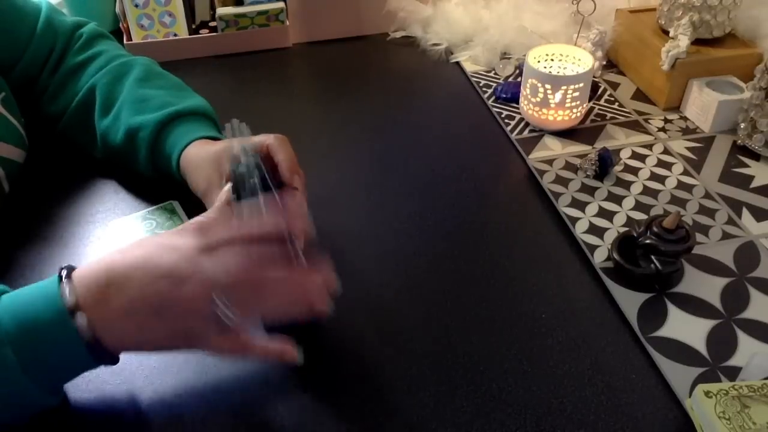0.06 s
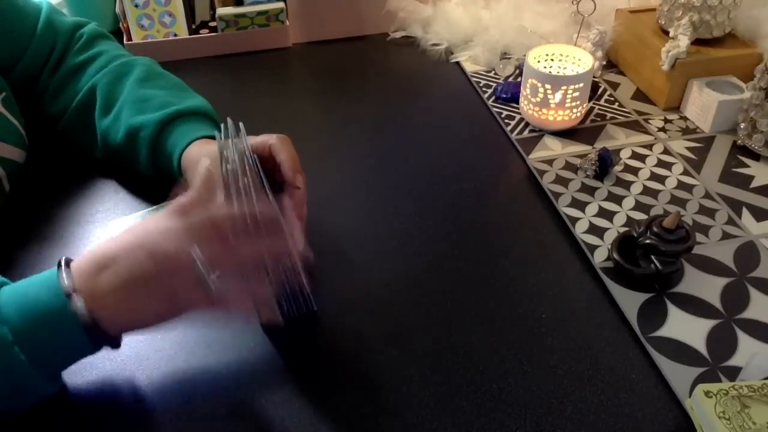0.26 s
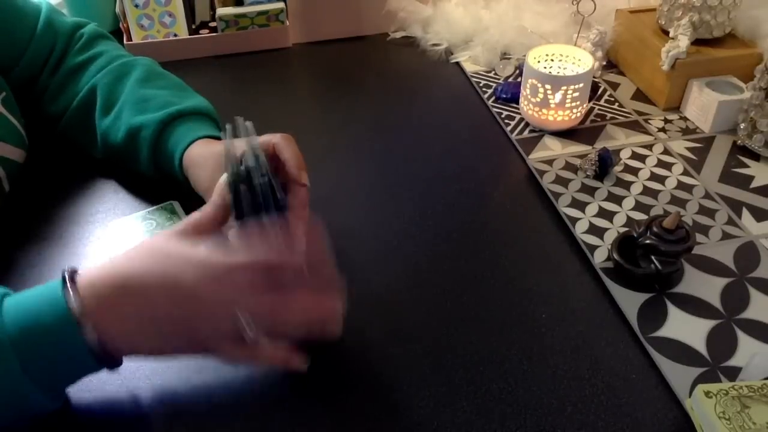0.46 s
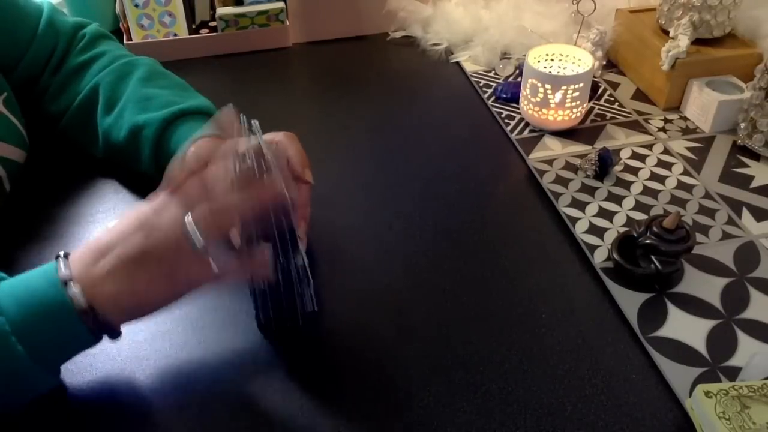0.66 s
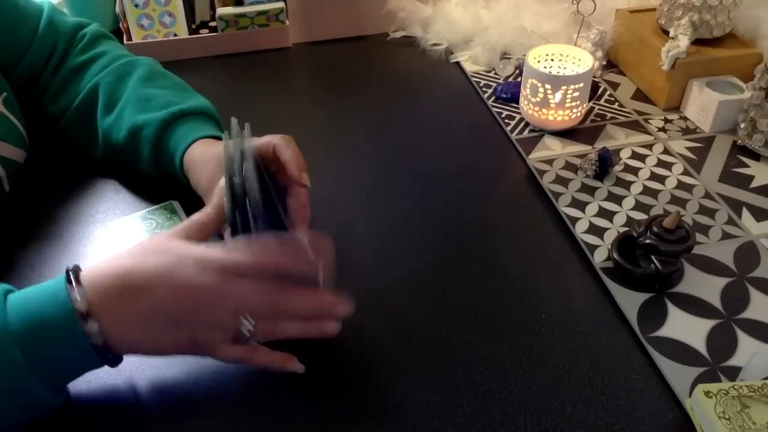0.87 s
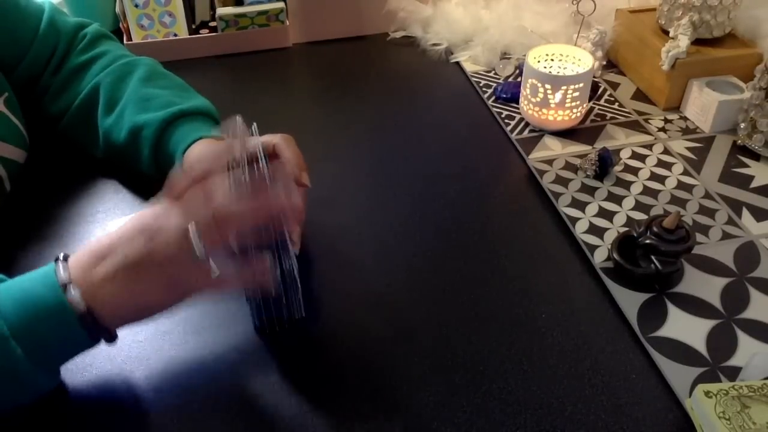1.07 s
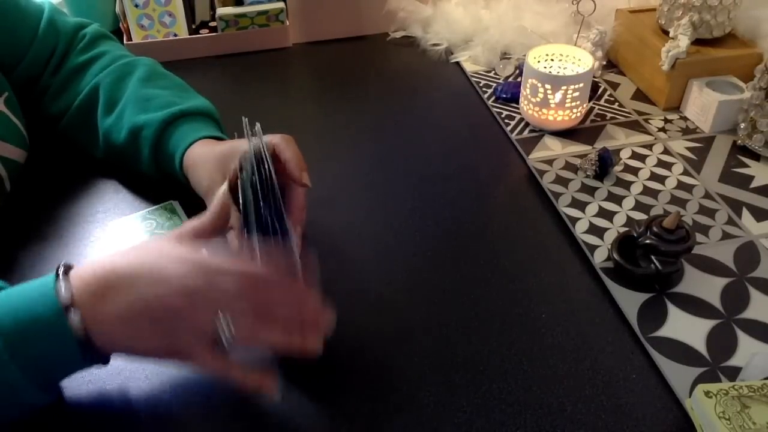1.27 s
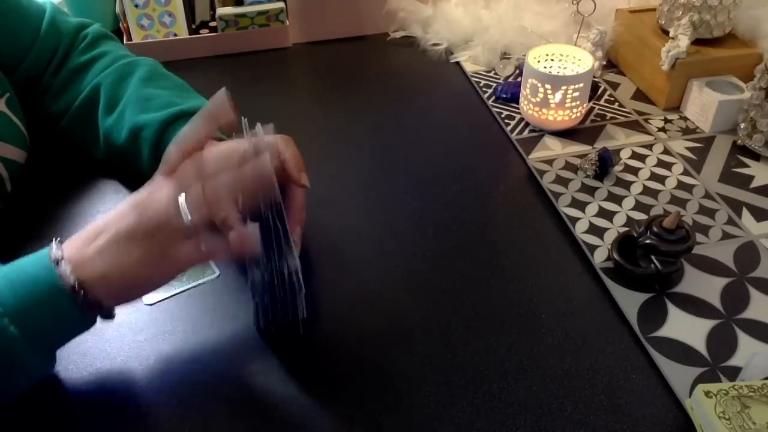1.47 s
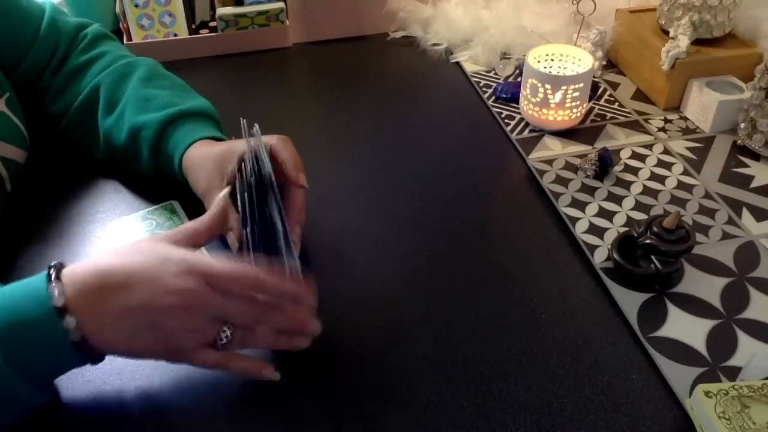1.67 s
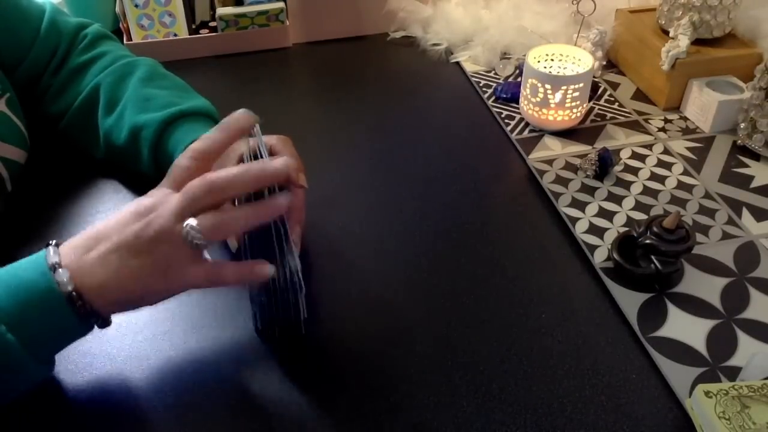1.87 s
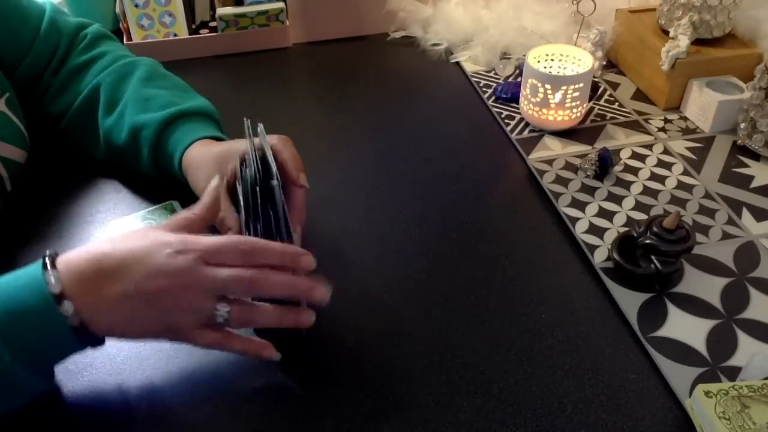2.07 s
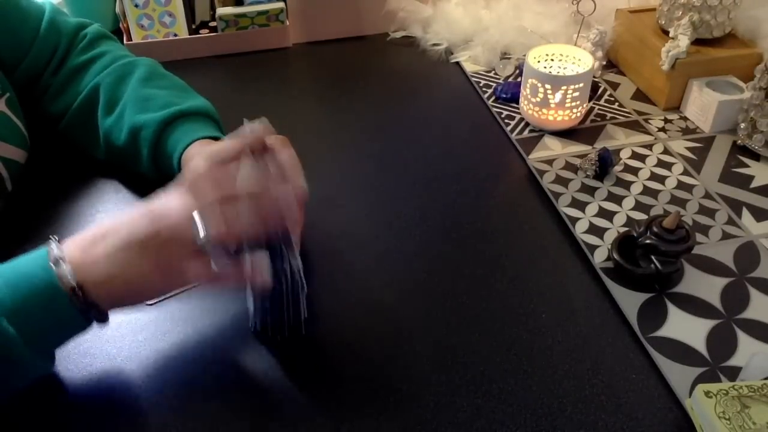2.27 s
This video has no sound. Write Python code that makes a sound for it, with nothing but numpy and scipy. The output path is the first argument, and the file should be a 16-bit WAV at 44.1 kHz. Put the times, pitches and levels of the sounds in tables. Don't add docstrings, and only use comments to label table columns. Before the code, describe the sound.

A deck of playing cards is shuffled overhand over a table in a quiet room; faint rasps swell into crisp slaps and ticks, with dull low thumps from the tabletop, heard close in mono.

```python
import sys
import numpy as np
from scipy import signal
from scipy.fft import rfft, irfft
from scipy.io import wavfile
from scipy.ndimage import uniform_filter1d

SR = 44100
rng = np.random.default_rng(int(sys.argv[2]) if len(sys.argv) > 2 else 0)


def to_linear_factor(level_db):
    exponent = np.asarray(level_db, float) / 20
    return 10 ** exponent


def inscribe(sig):
    pcm = np.round(np.clip(np.atleast_2d(sig).T, -1, 1) * 32767)
    wavfile.write(sys.argv[1], SR, pcm.astype(np.int16))


N = 101429


def evened(x):
    return x / np.sqrt(np.mean(x ** 2) + 1e-20)


def unit(x):
    return x / np.linalg.norm(x)


def read(points, hz):
    f, value = np.transpose(points)
    return np.interp(np.log(hz + 1), np.log(f + 1), value)


def add(mix, start_s, sound):
    part = mix[max(round(start_s * SR), 0):][:len(sound)]
    part += sound[:len(part)]


def ring(modes, length_s, spread_db):
    t = np.arange(round(length_s * SR)) / SR
    total = np.zeros(len(t))
    for hz, db, t60 in modes:
        strike_db = db + spread_db * rng.standard_normal()
        total += to_linear_factor(strike_db - 60 * t / t60) * np.sin(2 * np.pi * hz * t)
    return total


def cards():
    # (time [s], peak [dB], body [dB], edge [dB], crack t60 [s])
    slaps = [(0.084, -42, -14, -26, 0.035), (0.092, -30.5, -18, -23.5, 0.028),
             (0.1437, -18.5, -18.5, -32, 0.013), (0.1506, -17, -22.5, -29, 0.031),
             (0.161, -36, -18.5, -23, 0.025), (0.17, -40, -25, -23, 0.032),
             (0.2223, -35.5, -16.5, -46, 0.016), (0.375, -18.5, -12.5, -38, 0.034),
             (0.457, -47, -20, -10, .03), (0.5156, -10, -23.5, -8, 0.041), (0.527, -25.5, -22, -12, 0.035),
             (0.67, -58.5, -12, -12, .03), (0.745, -36.5, -12, -38, 0.06), (0.784, -31, -23, -25, 0.049),
             (0.829, -40.5, -10.5, -15, .03), (0.867, -41, -15, -21, .04),
             (0.883, -15.5, -15, -13.5, 0.035), (0.9, -22, -20.5, -30, 0.029),
             (0.911, -33.5, -15, -33.5, .03), (1.1385, -33.5, -4, -25.5, .04),
             (1.182, -48.5, -21, -11, 0.046), (1.219, -37.5, -14, -14.5, 0.063),
             (1.256, -44, -12, -40, .04), (1.3118, -10.5, -21.5, -10.5, 0.057),
             (1.533, -45.5, -13, -16, 0.017), (1.586, -40, -4, -25, .05), (1.609, -17, -21, -26.5, 0.026),
             (1.62, -30, -17, -26, 0.037), (1.658, -49, -3, -20, 0.046), (1.671, -34.5, -10, -28, 0.039),
             (1.696, -13.5, -18.5, -10.5, 0.036), (1.913, -42, -13, -16, 0.03),
             (1.921, -24, -13, -36.5, 0.074), (1.966, -13, -17, -8.5, 0.028), (1.974, -25, -10, -6, 0.028),
             (1.988, -23, -13.5, -15.5, 0.048), (2.243, -61.5, -6.5, -7, .03),
             (2.255, -48, -7.5, -2, 0.026), (2.287, -48.5, -14, -7, .03)]
    # (time [s], peak [dB], frequency [Hz], t60 [s])
    pops = [(0.1445, -31, 2320, .01), (0.152, -23, 2670, 0.016), (0.1695, -36.5, 2600, .02),
            (0.17, -36, 4620, .02), (0.377, -29, 1970, .03), (0.378, -34.5, 2800, 0.013),
            (0.5165, -21.5, 2760, 0.017), (0.5172, -26, 1940, .035), (0.518, -24, 3540, .025),
            (0.52, -32.5, 7140, 0.073), (0.529, -30.5, 1980, 0.043), (0.7455, -45, 1750, .03),
            (0.786, -37.5, 2690, 0.018), (0.868, -32, 2530, 0.024), (0.8834, -14.5, 1300, 0.0094),
            (0.8838, -14.5, 2500, 0.014), (0.9015, -27, 2420, 0.019), (1.22, -46, 4650, 0.033),
            (1.26, -35, 1100, 0.031), (1.268, -34, 2730, 0.034), (1.273, -37, 875, .03),
            (1.3132, -24, 2780, 0.017), (1.3136, -35, 3780, 0.025), (1.314, -19, 4650, 0.018),
            (1.6102, -22.5, 3695, 0.024), (1.6106, -25.5, 2020, 0.026), (1.659, -36.5, 1180, .05),
            (1.6975, -25.5, 2710, 0.015), (1.925, -36, 2780, 0.028), (1.9672, -21, 2775, 0.019),
            (1.9676, -23.5, 3600, 0.016), (1.968, -26.5, 4500, 0.016), (1.978, -29.5, 2930, .014),
            (1.991, -32.5, 2900, 0.011)]
    # (start [s], length [s], level [dB], body [dB], edge [dB])
    draws = [
        (0.06, 0.08, -47, -8, -20),
        (0.429, 0.092, -42, 3, -17.5),
        (0.795, 0.093, -45, -11, -17.5),
        (1.156, 0.074, -60.5, -8.5, -10.5),
        (1.535, 0.048, -57.5, -13, -7.5),
        (1.633, 0.067, -47.5, -9, -24.5),
        (2.273, 0.057, -56, -5.5, -4.5),
    ]
    # (start [s], length [s], level [dB], body [dB], edge [dB])
    scuffs = [(0, 0.041, -58.5, -12, -17.5), (0.088, 0.011, -57, -20, -9), (0.153, 0.024, -43, -5, -18),
              (0.384, 0.19, -62, -34, -17.5), (0.455, 0.053, -45.5, -12, -33.5),
              (0.74, 0.043, -51, -2, -15), (0.879, 0.014, -34, -24, -8.5),
              (0.883, 0.019, -33, -16.5, -27.5), (1.13, 0.082, -63, -6, -11.5),
              (1.248, 0.037, -42, -13.5, -39.5), (1.262, 0.053, -40.5, -2.5, -23.5),
              (1.534, 0.056, -65, -5, -5.5), (1.584, 0.025, -41, -1, -26),
              (1.661, 0.053, -43.5, -10.5, -36), (1.92, 0.044, -47.5, -5, -19.5),
              (2.018, 0.038, -52, -2, -38.5), (2.247, 0.041, -64, -7, -13)]
    flight_s = .0006
    mix = np.zeros(N)
    for start_s, *row in slaps:
        add(mix, start_s + flight_s, slap(*row))
    for start_s, *row in pops:
        add(mix, start_s, pop(*row))
    for start_s, *row in draws:
        add(mix, start_s, slide(.95, *row))
    for start_s, *row in scuffs:
        add(mix, start_s, slide(.092, *row))
    return mix


def slap(peak_db, body_db, edge_db, crack_t60):
    # (frequency [Hz], level [dB], t60 [s])
    deck_modes = [(736, -5, 0.065), (1188.6, 6, 0.077), (1736, -13.5, 0.081), (2077, -4.5, 0.08)]
    tick_db, tick_t60, crack_db, first_db = 3, .007, 5, -6.5
    knock_db = -4.5 + .28 * (body_db + 15)
    t = np.arange(SR // 3) / SR
    tick_noise, crack_noise = rng.standard_normal((2, len(t)))
    tick = np.diff(tick_noise * to_linear_factor(-60 * t / tick_t60), prepend=0)
    crack = crack_noise * to_linear_factor(-60 * t / crack_t60)
    blow = to_linear_factor(tick_db) * unit(tick) + to_linear_factor(crack_db) * unit(crack) + room()
    blow[0] -= to_linear_factor(first_db)
    deck = unit(ring(deck_modes, len(t) / SR, 1.5))
    struck = through_body(blow, ring_db=-10)[:len(t)] - to_linear_factor(knock_db) * deck
    sound = contact(struck, body_db, edge_db, top_db=-7)
    return to_linear_factor(peak_db) * sound / abs(sound).max()


def pop(peak_db, hz, t60):
    length_s, rise_s, split = .1, .00056, .021
    path = .38 * room()
    path[0] = 1
    tones = [(hz * (1 + split * k), peak_db - 4 - 5 * abs(k), t60) for k in (-1, 0, 1)]
    onset = np.minimum(np.arange(round(length_s * SR)) / SR / rise_s, 1)
    return signal.fftconvolve(ring(tones, length_s, 2.5) * onset, path)


def slide(peak_at, length_s, level_db, body_db, edge_db):
    grit_db, clump_db = 2, 3.5
    n = min(round(length_s * SR) + 2, 6000)
    hiss, rough = rng.standard_normal((2, n))
    grit = grit_db * evened(uniform_filter1d(rough, 24))
    clumps = clump_db * evened(uniform_filter1d(rough[::-1], 260))
    u = np.linspace(0, 1, n)
    stroke = np.minimum(u / peak_at, (1 - u) / (1 - peak_at)) ** 0.73
    rasp = contact(hiss * to_linear_factor(grit + clumps) * stroke, body_db, edge_db, top_db=10)
    path = room()
    path[0] = 1
    sound = through_body(signal.fftconvolve(rasp, path), ring_db=-14.5)
    return to_linear_factor(level_db) * sound / np.sqrt(np.sum(sound ** 2) / n)


def contact(x, body_db, edge_db, top_db):
    # (frequency [Hz], gain [dB])
    mic = [(300, 1.5), (600, 4.5), (1200, -2), (2800, 1), (6000, -5.5), (7300, -8.5), (10000, -10.5),
           (16000, -31)]
    low = body_db + 15
    high = edge_db + 13
    # (frequency [Hz], gain [dB])
    shape = [(375, low - 11.5), (1296, low), (1940, 0), (3030, .28 * high), (8300, high), (13000, high + top_db)]
    hz = abs(np.fft.fftfreq(1024, 1 / SR))
    return signal.fftconvolve(x, causal(read(shape, hz) + read(mic, hz)))


def causal(db):
    log_gain = db * np.log(10) / 20
    spectrum = np.exp(np.conj(signal.hilbert(log_gain)))
    return np.fft.ifft(spectrum).real[:len(db) // 2]


def through_body(x, ring_db):
    # (frequency [Hz], level [dB], t60 [s])
    body_modes = [(558, -4, 0.03), (799, -12.5, 0.12), (950, -4, 0.063), (1222, -5, 0.057),
                  (1750, 0, 0.023), (1910, -9, 0.059), (2280, 2, 0.016), (2910, 2.5, 0.022),
                  (3700, -17, 0.01), (3846, -1, 0.021), (4850, -0.5, 0.016), (7480, -15.5, 0.05),
                  (8790, 5.5, 0.0082), (10510, -11.5, .015)]
    path = to_linear_factor(ring_db) * unit(ring(body_modes, .15, 2.5))
    path[0] = 1
    return signal.fftconvolve(x, path)


def room():
    # (frequency [Hz], t60 [s])
    decay = [(500, 0.17), (1500, 0.19), (3000, 0.15), (5000, 0.2), (6300, 0.097), (7300, 0.25),
             (8500, 0.16), (15000, 0.18)]
    level_db, delay_s, n = -5.5, .0041, SR // 3
    hz, t, z = signal.stft(rng.standard_normal(n), SR, nperseg=128)
    dying = z * to_linear_factor(-60 * t / read(decay, hz)[:, None])
    tail = signal.istft(dying, SR, nperseg=128)[1][:n]
    fade_in = np.clip(np.arange(len(tail)) / SR / delay_s - .5, 0, 1)
    return to_linear_factor(level_db) * unit(tail * fade_in)


def table_top():
    # (time [s], push [dB], ring [dB])
    knocks = [(0.018, -37, -42.5), (0.077, -41.5, -41), (0.15, -29, -40), (0.195, -56, -37.5),
              (0.378, -25, -32.5), (0.41, -63, -34.5), (0.515, -30.5, -37.5), (0.746, -35, -43.5),
              (0.787, -68.5, -55.5), (0.838, -44, -41.5), (0.882, -30, -41), (0.914, -36, -42.5),
              (1.137, -34.5, -51.5), (1.213, -46.5, -58), (1.256, -56, -57.5), (1.312, -48, -41),
              (1.345, -43, -51.5), (1.532, -38.5, -46.5), (1.552, -36, -50.5), (1.605, -31, -42.5),
              (1.696, -66, -47), (1.776, -65, -62), (1.922, -33, -41), (1.965, -30, -44.5),
              (2.009, -58.5, -43.5), (2.256, -35, -51)]
    # (frequency [Hz], level [dB], t60 [s])
    push_modes = [(47, -9.5, .2), (63.5, -3.5, 0.26), (92.6, -8, 0.19), (116.3, 5, 0.081),
                  (136.4, -8.5, 0.022)]
    # (frequency [Hz], level [dB], t60 [s])
    top_modes = [(175, -6, .35), (192.95, 0.5, 0.3), (217, -14, 0.083), (239.9, -5, 0.26),
                 (267, -13.5, 0.43), (293, -3, 0.088), (321.3, -12, 0.41)]
    length_s, swell_s, soft_hz = .8, .005, 380
    out = np.zeros(N)
    swell = 1 - np.exp(-np.arange(round(length_s * SR)) / SR / swell_s)
    low_pass = signal.butter(2, soft_hz, fs=SR)
    for start_s, push_db, ring_db in knocks:
        push = to_linear_factor(push_db - 9) * ring(push_modes, length_s, 2.5)
        ringing = to_linear_factor(ring_db + 3) * ring(top_modes, length_s, 2.5) * swell
        add(out, start_s, signal.lfilter(*low_pass, push + ringing))
    return out


def sway():
    # (time [s], frequency [Hz], rms level [dB])
    drift = [(0.0, 29.86, -53), (0.27, 28.05, -36.5), (0.33, 31.3, -53), (0.38, 29.5, -34),
             (0.42, 31.2, -51), (0.44, 30.5, -40), (0.9, 31.26, -50.5), (0.93, 28.03, -59.5),
             (1.0, 26.95, -40), (1.06, 28.7, -50), (1.28, 29.6, -43.5), (1.34, 29.2, -59.5),
             (1.4, 29.5, -44.5), (1.53, 30.9, -60.5), (1.57, 28.53, -43.5), (1.98, 29.8, -51),
             (2.03, 29.87, -46), (2.3, 28.2, -56)]
    s, hz, db = np.transpose(drift)
    t = np.arange(N) / SR
    phase = 2 * np.pi * np.cumsum(np.interp(t, s, hz)) / SR
    return np.sqrt(2) * to_linear_factor(np.interp(t, s, db)) * np.sin(phase)


def air():
    # (frequency [Hz], level [dB])
    colour = [(60, 0), (150, -13), (193, 3), (250, -6.5), (335, -5), (400, -23.5), (5000, -33),
              (13000, -42), (16000, -50)]
    level_db = -58
    hz = np.fft.rfftfreq(N, 1 / SR)
    gain = to_linear_factor(read(colour, hz)) * (hz > 30)
    return to_linear_factor(level_db) * evened(irfft(rfft(rng.standard_normal(N)) * gain, N))


def scene():
    return (cards() + table_top() + sway() + air())[None]


def top_cut(x):
    return signal.sosfilt(signal.butter(12, 16530, fs=SR, output="sos"), x)


def record(dry):
    low_pass = signal.firwin(255, 16300, fs=SR)
    mix = signal.oaconvolve(dry, low_pass[None], "same")
    return top_cut(mix)


dry = scene()
out = record(dry)
inscribe(out)
```